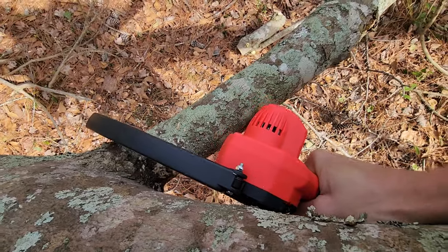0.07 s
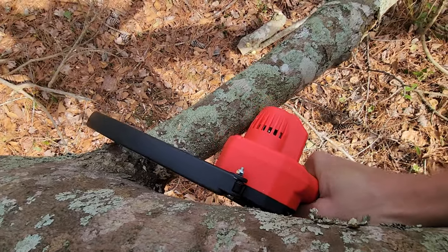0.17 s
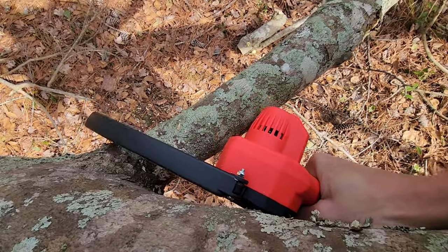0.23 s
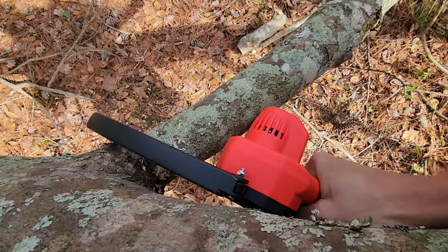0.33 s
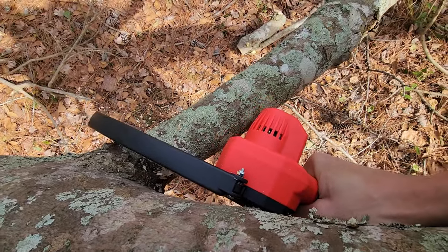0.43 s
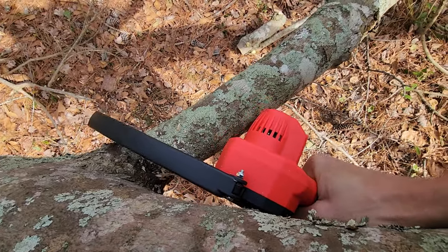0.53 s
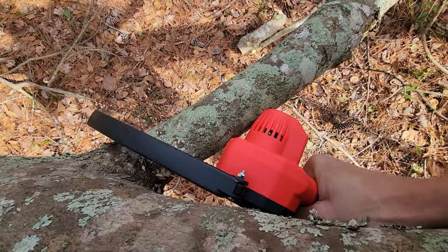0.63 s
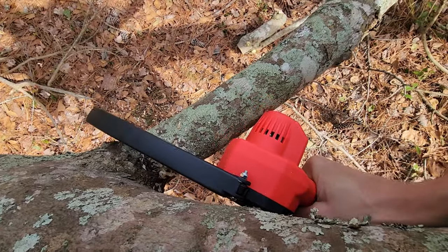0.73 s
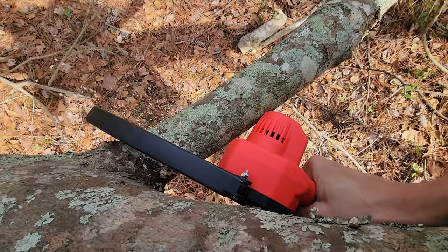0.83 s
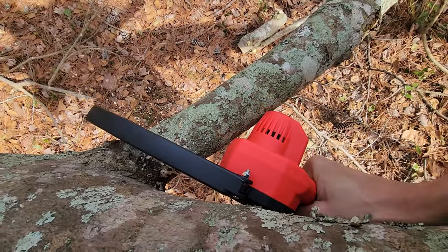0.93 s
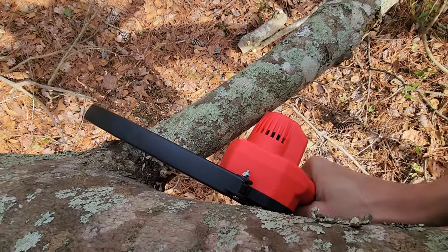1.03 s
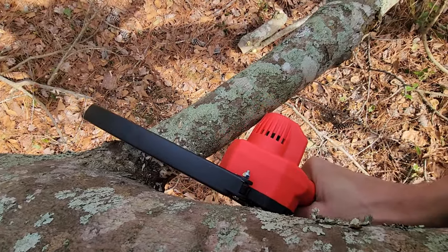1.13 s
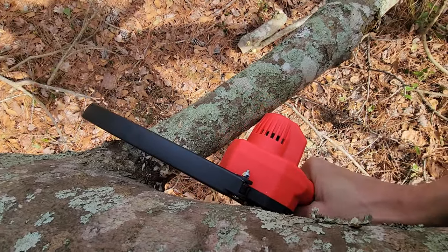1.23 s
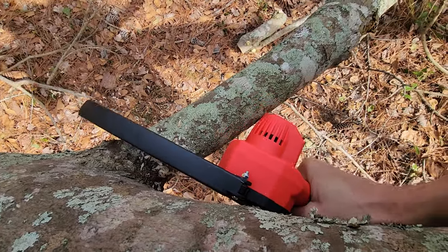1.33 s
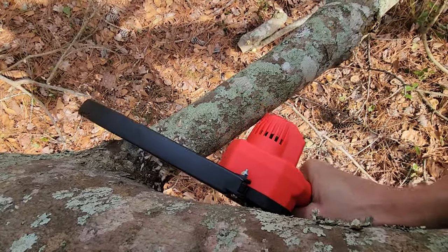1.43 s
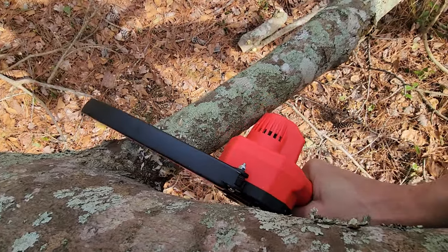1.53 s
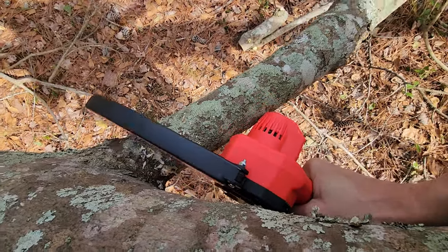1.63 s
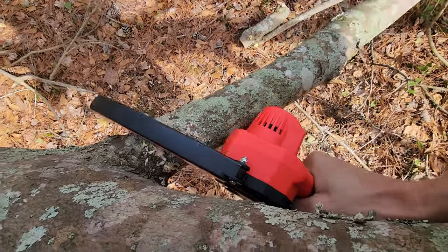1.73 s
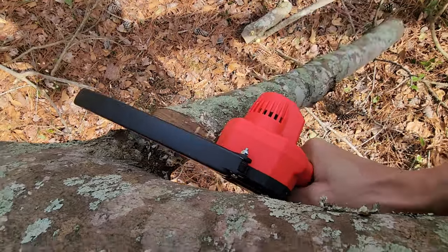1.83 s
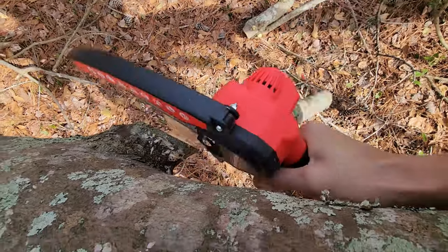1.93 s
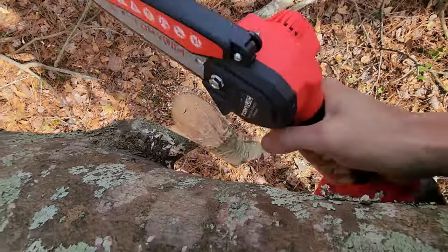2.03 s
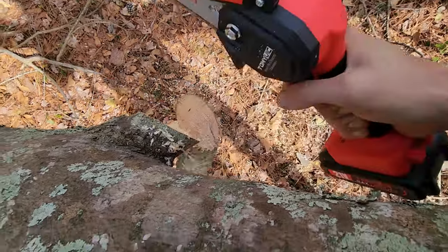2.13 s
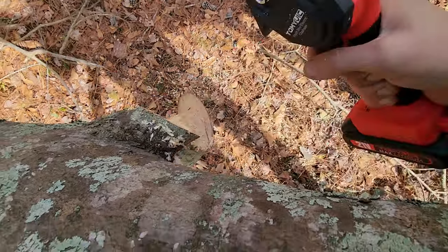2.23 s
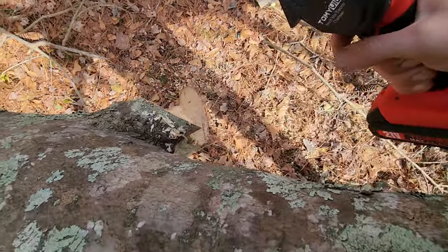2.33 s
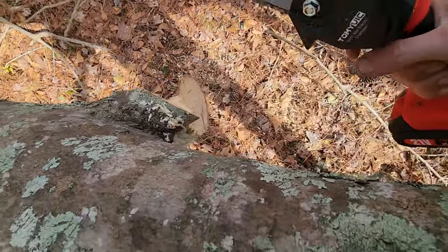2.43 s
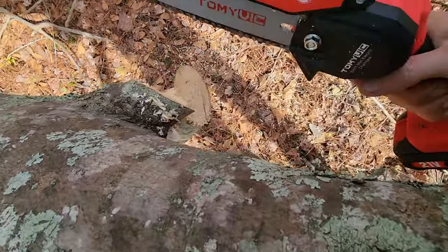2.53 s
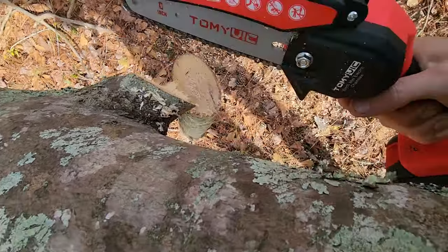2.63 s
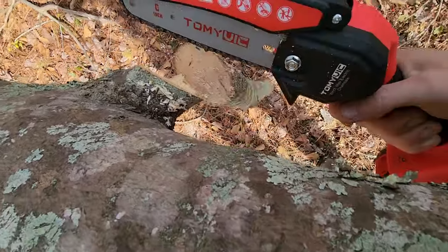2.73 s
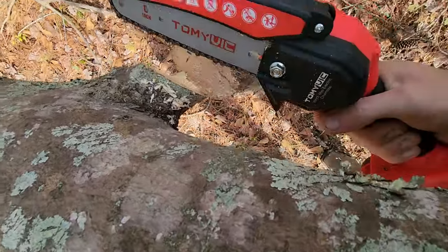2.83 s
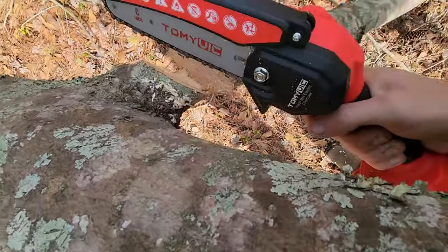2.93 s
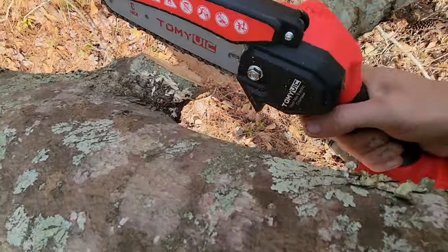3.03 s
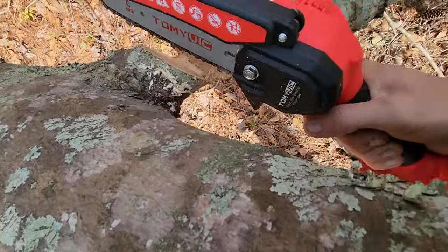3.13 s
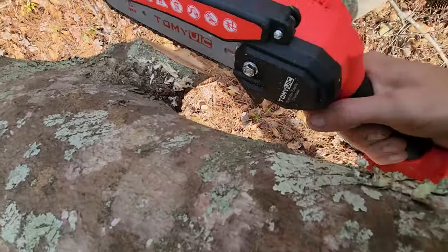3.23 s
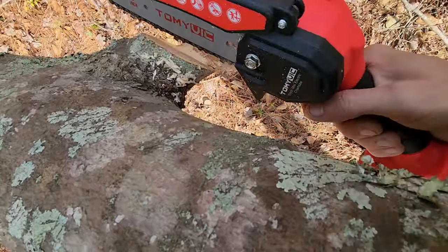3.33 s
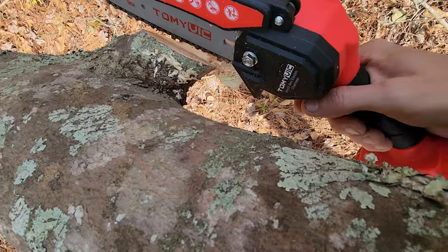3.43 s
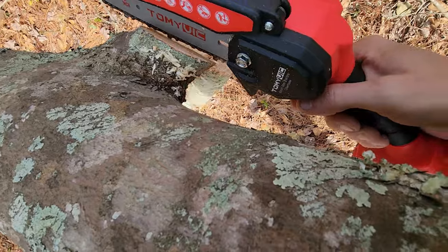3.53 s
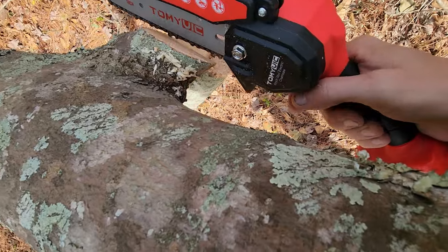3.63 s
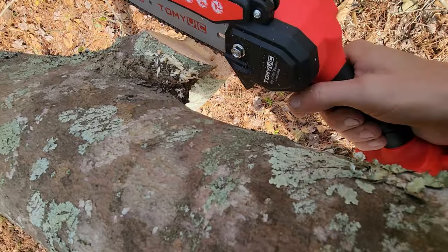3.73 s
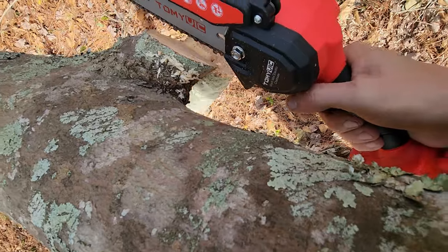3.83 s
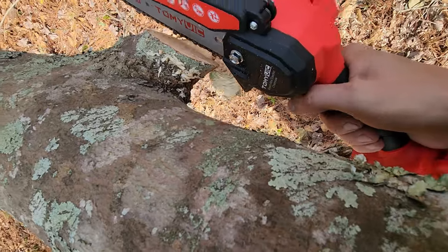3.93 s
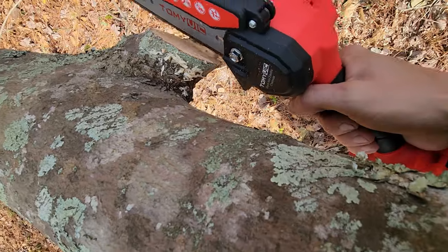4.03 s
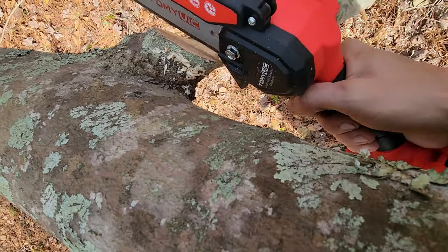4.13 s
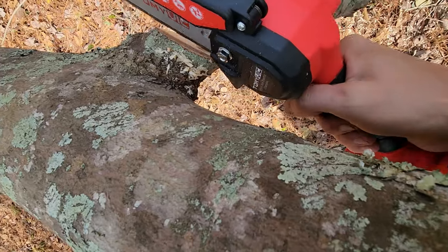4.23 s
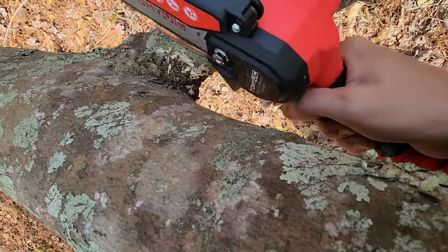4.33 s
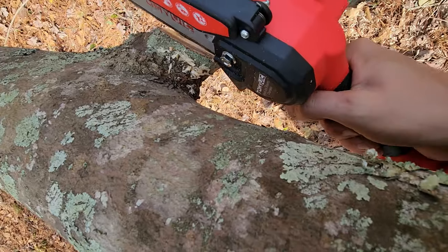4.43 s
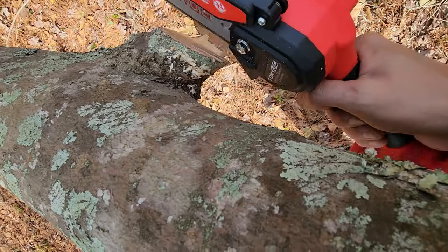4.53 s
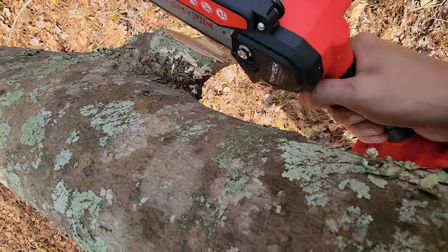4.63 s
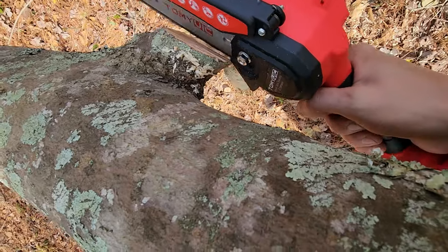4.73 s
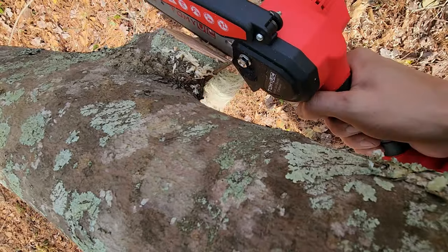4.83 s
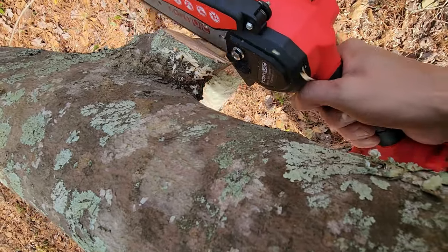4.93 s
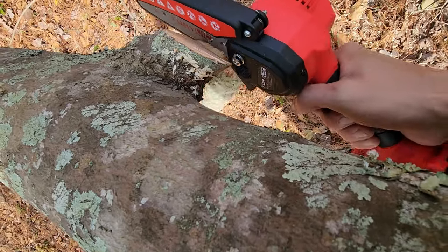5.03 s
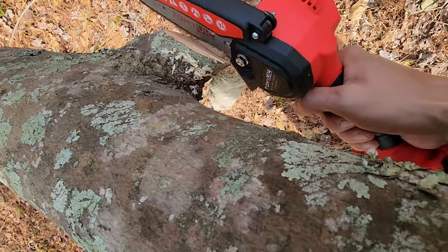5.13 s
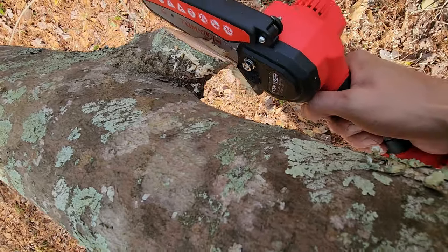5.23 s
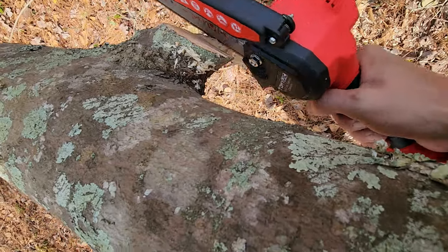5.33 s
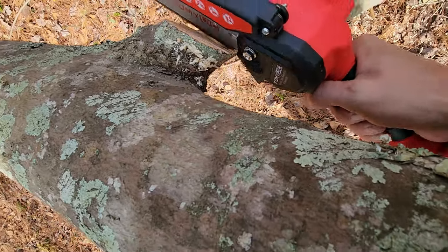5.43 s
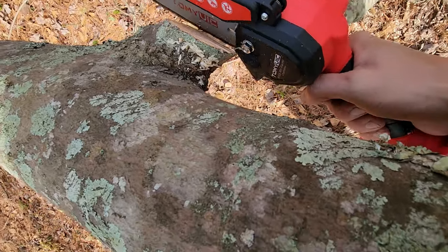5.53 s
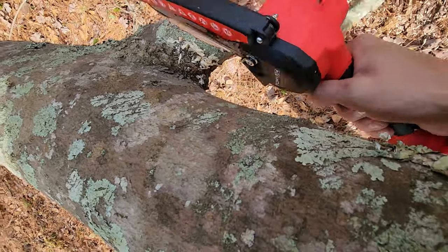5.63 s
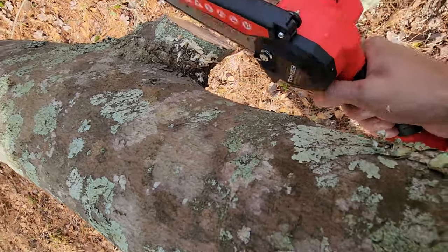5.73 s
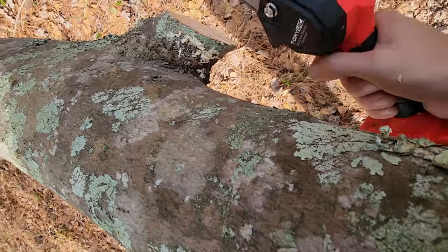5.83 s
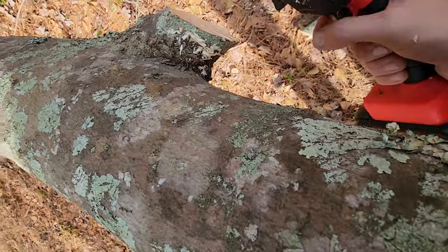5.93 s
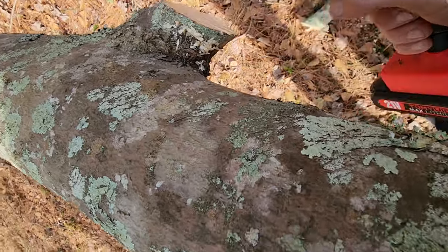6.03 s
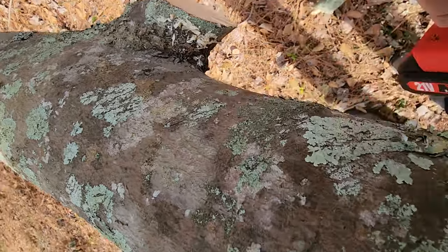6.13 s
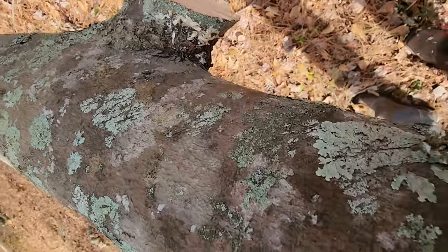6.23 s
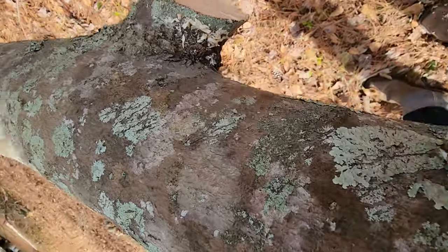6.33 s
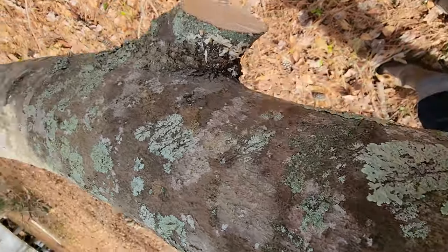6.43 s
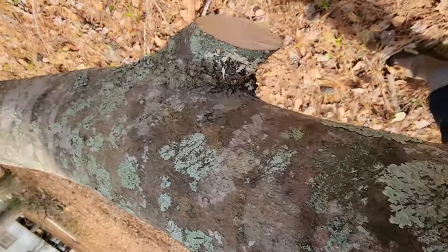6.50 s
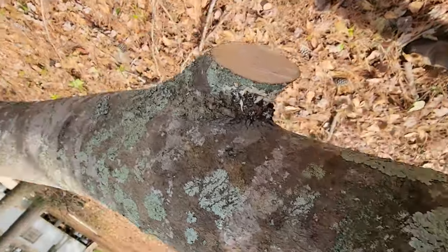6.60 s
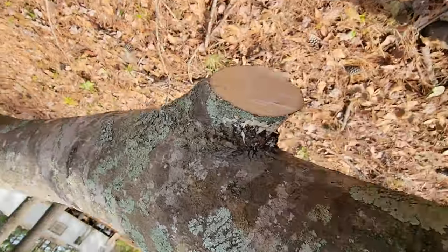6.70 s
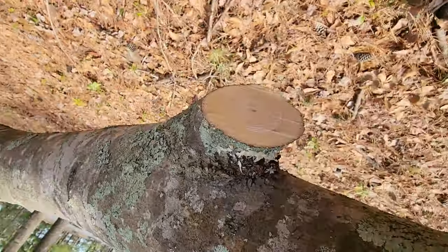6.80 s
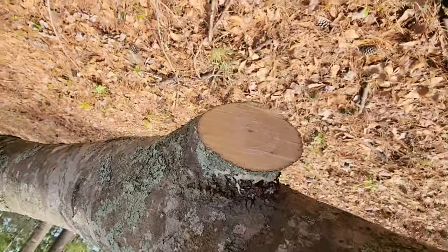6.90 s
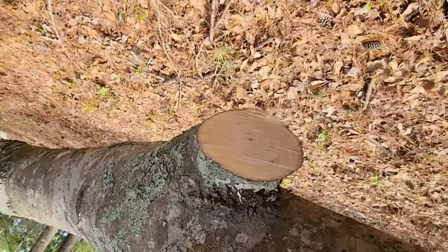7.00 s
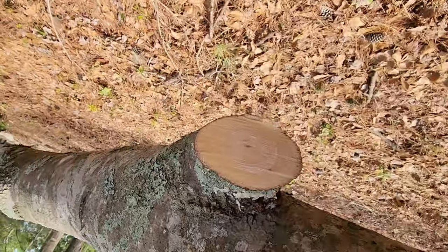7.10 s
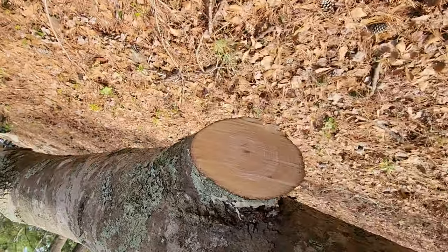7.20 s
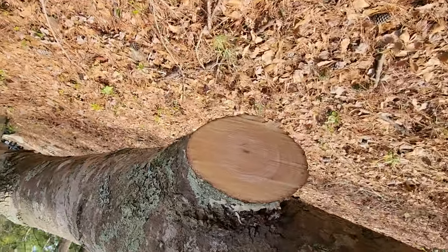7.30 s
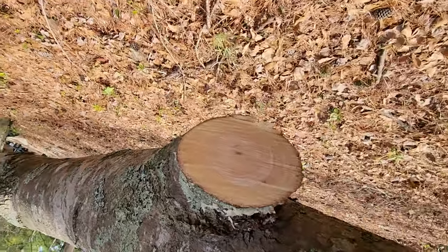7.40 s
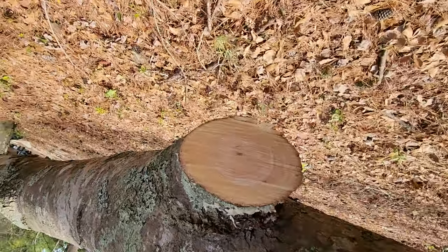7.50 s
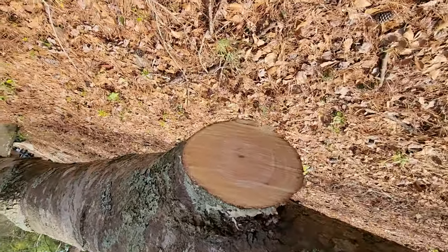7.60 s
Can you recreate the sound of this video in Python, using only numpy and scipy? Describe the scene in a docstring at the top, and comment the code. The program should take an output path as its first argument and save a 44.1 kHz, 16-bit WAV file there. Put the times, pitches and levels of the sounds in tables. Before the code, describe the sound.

A small battery chainsaw is already cutting a branch, at arm's length from a stereo microphone in quiet woods. The chain clatters on the steel bar, the gears whine unevenly, and the teeth knock and rasp in the wood, with thin high squeals. Around 1.6 seconds the motor sags and nearly stalls. At 1.9 it breaks free with a bright racing rattle, then coasts down in pitch, stopping at about 2.9. Light clicks and soft rubbing follow as the saw shifts in the hand. At 4.1 a sharp click starts it again, and it trims the stub, faster and steadier, with short bites and a dull bump near 5.9. From 6 seconds it winds down, stopping at about 6.7. Dry leaves and small twigs then crackle softly underfoot on the right until about 7.5, over a faint outdoor rumble and hiss.

```python
"""A small battery chainsaw, at arm's length from a stereo microphone in quiet woods, cuts a branch off a
fallen log, coasts to a stop, then trims the stub. Chain links clatter on the steel bar and ring the
plastic casing, the gears whine and sag under load, the teeth knock in the wood and the bar squeals in
the kerf. Between and after the cuts the saw clicks and rubs in the hand, close by; at the end dry
leaves crackle underfoot, off to the right."""
import sys
import numpy as np
from scipy import signal
from scipy.fft import rfft, irfft, next_fast_len
from scipy.io import wavfile

SR = 44100
rng = np.random.default_rng(int(sys.argv[2]) if len(sys.argv) > 2 else 0)


def to_wav(sig):
    """Store sig (one row per channel, or 1-D mono) as 16-bit WAV at the path in sys.argv[1].

    Samples outside -1..1 are clipped; the rate is SR.
    """
    pcm = np.clip(np.atleast_2d(sig), -1, 1) * 32767
    pcm = np.round(pcm).astype(np.int16)
    wavfile.write(sys.argv[1], SR, pcm.T)  # frames by channels


N = 337806
T = np.arange(N) / SR
FREQS = np.fft.rfftfreq(2 * next_fast_len(N // 2 + 4096), 1 / SR)
SIZE = 2 * (len(FREQS) - 1)
CREEP_HZ, WORKING_HZ = 20, 800  # links per second: the chain falls silent, the chain works

# Levels in the tables are relative: each source applies its own gain on top.
# The chain under power, one list per run, until the trigger is let go.
# Each row: time in seconds, speed in links per second.
DRIVEN_SPEED = [
    [(-.04, 469.3), (.1, 586.3), (.18, 608.3), (.3, 604.6), (.45, 660), (.52, 677.5), (.6, 634), (.72, 616),
     (.8, 653.4), (.87, 622.5), (.93, 663), (1.07, 679.7), (1.15, 642), (1.3, 603), (1.38, 698.6),
     (1.45, 673), (1.5, 579.2), (1.56, 496.3), (1.65, 400.8), (1.72, 449.6), (1.82, 471.2), (1.93, 935),
     (2.05, 967)],
    [(4.141, 230.5), (4.168, 509.7), (4.19, 668), (4.24, 844), (4.7, 853.3), (5.15, 809), (5.5, 868.6),
     (5.7, 827), (5.95, 898)],
]
# What stops the chain after each run. Each row: friction in Hz per second, drag time in seconds.
CHAIN_BRAKING = [(870, 1.8), (865, 1.34)]
# The saw at working speed, one list per run.
# Each row: time in seconds, then casing clatter, steel chatter and fine spray in dB.
SAW_LEVELS = [
    [(.15, -22, -21, -20.5), (.6, -23.5, -23, -23), (1.35, -23.5, -22.5, -25), (1.7, -23, -20.8, -25),
     (1.88, -24, -21.5, -23.5), (2.03, -25.5, -23.5, -23.5), (2.17, -24.5, -22.5, -22),
     (2.3, -27, -22.5, -25), (2.55, -28, -24.5, -25.5), (2.7, -29, -24.5, -27), (2.85, -28.5, -28, -35)],
    [(4.17, -20.5, -16.5, -18.5), (4.35, -23, -21.5, -21), (4.75, -22.5, -22, -23), (4.97, -23, -20.5, -20),
     (5.2, -24, -21.5, -25), (5.65, -24, -21, -21), (5.82, -25, -21.5, -28.5), (5.97, -26, -23.5, -23),
     (6.08, -25, -25, -24.5), (6.25, -25.5, -25, -24.5), (6.45, -29, -27, -26), (6.6, -31, -26.5, -30)],
]
# Gear rattle against the clatter in a slow, unloaded chain. Each entry: one run's level in dB.
GEAR_RATTLE_DB = [-6.3, -3.5]
# The loaded tones as the load shifts. Each row: time in seconds, then low, middle and high tone in dB.
LOADED_TONE_LEVELS = [(0, 0.5, 1, -2), (.18, -0.5, -3, 2.5), (.3, 1.5, -2.5, -1.5), (.38, 1, -2, 0.5),
                      (.52, -1.5, 3, -2.5), (.62, -0.5, -1.5, 1.5), (.76, -0.5, 0, -1),
                      (.9, -1.5, -1.5, -0.5), (1.05, 0, 2, -3), (1.2, -4.5, -1, 0), (1.35, -2, -2.5, -0.5),
                      (1.5, -3.5, -3, -4.5), (1.58, -5, 2.5, -8), (1.67, -5.5, -1, -7.5),
                      (1.8, -4, 2.5, -6.5), (1.9, -0.5, -1, 0)]

# Tones of the drive. Each row: multiple of the link rate, level in dB, width in Hz at cutting speed.
LOADED_TONES = [(1, -1, 24), (2.87, -1.5, 100), (4.65, -2, 75)]
SPIN_UP_TONES = [(1, -4, 20), (2.87, 0, 60)]
FREE_GEAR_TONES = [(2.92, 0, 68), (4.7, -2.5, 160), (6.7, -6, 240), (8.5, -3, 260)]

# Sounds that rise, hold and die away. Each row: start in seconds, length in seconds, level in dB.
WOOD_CONTACT = [(-.04, 2.0, -39), (4.16, 1.82, -48)]  # teeth resting in the branch, then the stub
DEEP_BITES = [(-.04, 0.21, -29.5), (.21, 0.2, -26), (.44, 0.42, -30.5), (.92, 0.057, -31),
              (1.05, .2, -33.5), (1.29, .02, -29.5), (1.39, 0.28, -35), (1.73, 0.13, -29),
              (4.16, 0.048, -35.5), (4.3, 0.03, -26.5), (4.405, 0.059, -30.5), (4.49, 0.017, -33.5),
              (4.56, 0.04, -33), (4.82, 0.033, -35), (4.93, 0.039, -34), (4.985, 0.032, -24),
              (5.125, 0.057, -25.5), (5.36, 0.028, -33), (5.612, 0.027, -27), (5.66, 0.087, -31)]  # teeth digging in harder
MOTOR_STRAIN = [(-.04, 1.84, -6), (.05, 0.84, -10), (1.12, .2, -10), (1.55, 0.31, -5)]  # labouring, pinched twice, then nearly stalling
BAR_SQUEALS = [(-.04, 1.65, -27), (.42, .11, -20), (.78, 0.34, -22.5), (1.32, 0.051, -16),
               (1.41, 0.029, -19), (1.68, 0.094, -25), (1.84, 0.047, -24), (6.44, 0.084, -32)]  # the bar rubbing the kerf, or singing as the chain slows
CUTTER_SNAGS = [(.74, 0.034, -14.5), (1.05, 0.028, -30), (1.82, 0.017, -19.5), (4.162, .018, -21),
                (4.408, 0.046, -25), (4.492, 0.02, -12.5), (4.99, 0.029, -33), (5.135, 0.06, -16),
                (5.612, 0.02, -15)]  # a cutter catching and rattling the casing
CHAIN_WHIPS = [(1.9, .17, -24.5), (2.0, .08, -27.5)]  # the chain coming free of the branch
HAND_SHIFTS = [(2.8, 0.11, -52.5), (3.0, .22, -65), (4.03, .1, -61.5), (6.62, 0.055, -58)]  # the saw moving in the hand
MOTOR_SPIN_UP = [(4.163, .035, -6.5)]  # starting at full torque
LEAF_RUSTLES = [(6.63, 0.7, -55), (6.76, .02, -52), (6.83, 0.18, -49.5), (7.15, 0.15, -50),
                (7.38, 0.28, -68)]  # dry leaves underfoot

# Parts that ring. Each row: frequency in Hz, width in Hz, level in dB.
CASING_MODES = [(695, 130, -5), (882, 110, 2), (987, 330, -2), (1437, 200, 4), (1593, 515, -1),
                (2183, 370, -0.5)]  # plastic casing, chain taut
SLACK_CASING_MODES = [(827, 120, -2), (1079.8, 180, -9.5), (1500, 350, 0), (1750, 171, 2.5),
                      (2030, 360, 0.5)]
BAR_MODES = [(3760, 150, -8), (4300, 260, 0), (4700, 470, -7.5), (5480, 270, -2.5), (6120, 300, -2),
             (7354, 290, 0)]  # steel bar, chain taut
SLACK_BAR_MODES = [(3480, 450, -8), (4840, 1100, -5.5), (6330, 530, 0.5), (7600, 200, 0.5),
                   (7720, 290, -6.5), (8200, 210, -5.5)]
GEAR_COVER_MODES = [(830, 120, -1.5), (1440, 300, 1.5), (2150, 400, -3.5)]
BRANCH_MODES = [(65, 30, -7), (117, 22, -2.5), (178.7, 12, 5), (257, 37, -1.5), (357, 77, -5),
                (560, 73, -2)]
STUB_MODES = [(68, 20, -2.5), (104.2, 26, 2), (160, 24, 0), (259, 36, -1.5), (369, 180, -9.5),
              (574, 70, -2.5)]
HANDLE_MODES = [(430, 47, 6.5), (794, 580, -7), (1250, 60, -4.5), (2010, 450, -18.5)]

# Tone colours at the microphone. Each row: frequency in Hz, level in dB.
STEEL_COLOUR = [(1500, -30), (2500, -2), (3000, -3), (3700, 0.5), (4400, -1.5), (5000, 1.5), (5500, 1),
                (5950, -3.5), (6400, -3.5), (6900, -3.5), (7400, -2.5), (8200, -4.5), (9500, -21.5),
                (13000, -38)]  # links scraping the bar
SPRAY_COLOUR = [(6000, -38), (8500, -7), (9800, -6), (11000, -2), (12300, 1), (14000, -1), (16000, -4.5)]  # fine ticks off the chain
HOUSING_COLOUR = [(150, -28), (460, -18.5), (610, -1.5), (800, -6.5), (1100, -4.5), (1380, -4.5),
                  (1700, -5), (1950, 2), (2300, -9.5), (2900, 0.5), (3500, -10), (6000, -12)]  # what the housing passes of the whine
FIBRE_COLOUR = [(120, -14), (300, -4), (600, -3), (1300, 0), (2300, -5.5), (4000, -14.5), (9000, -29)]  # wood tearing
TICK_COLOUR = [(200, -26), (800, -4.5), (1400, -4), (2600, -8), (4000, 0), (5500, 4.5), (7000, 2),
               (9500, -9.5), (12500, -0.5), (16000, -10.5)]  # chips and clicks
WOODS_COLOUR = [(25, -11), (60, -2), (120, -6.5), (200, -18), (450, -23), (1000, -31.5), (2800, -40.5),
                (5500, -34), (7300, -37), (9300, -58.5), (12500, -51), (16000, -56)]
LEAF_COLOUR = [(200, -26), (500, -5.5), (750, -12.5), (1200, -11.5), (2000, -9.5), (2700, -15.5),
               (3700, -5.5), (5400, -2), (7200, 1), (8300, -14), (9700, -27), (12000, 0), (16000, -10.5)]

# The saw bumping the log or knocking in the hand.
# Each row: start in seconds, level in dB, pitch in Hz, seconds to fall 60 dB.
BODY_BUMPS = [(0.251, -22.5, 76, 0.29), (3.162, -48.5, 75, .15), (3.641, -38, 97, 0.097),
              (4.305, -26.5, 105, 0.058), (4.825, -26.5, 88.3, 0.058), (5.011, -25, 101.2, 0.063),
              (5.619, -24, 88, 0.14), (5.705, -21, 96, 0.085), (5.85, -11.5, 101.1, 0.066)]
# Clicks of the slack chain, trigger and casing, and a few sharp cracks among the leaves at the end. Each row:
# time in seconds, level in dB, treble over bass in dB, seconds to fall 60 dB.
SAW_CLICKS = [(2.8, -34, -1, 0.45), (2.838, -24.5, -1, 0.014), (2.903, -31.5, 5.5, .007),
              (3.154, -46, -15.5, 0.073), (3.171, -36, -5.5, 0.01), (3.384, -49.5, -3.5, 0.046),
              (3.63, -26, 8, 0.015), (3.636, -33, -9.5, 0.036), (3.704, -47, -9, 0.01),
              (3.765, -34, -7, 0.036), (3.785, -21, 12, .011), (3.823, -24, 2.5, 0.015),
              (3.832, -27.5, 3.5, .041), (4.061, -49.5, -6.5, 0.22), (4.122, -38, 7.5, 0.027),
              (4.145, -9, -9, 0.063), (6.649, -29.5, 13, 0.025), (6.733, -33.5, -12.5, 0.018),
              (7.18, -24.5, 0, 0.01)]
# Leaves and twigs breaking. Each row: start in seconds, level in dB, pitch in Hz.
TWIG_SNAPS = [(6.69, -35, 4100), (6.712, -42, 4330), (6.757, -27.5, 4100), (6.863, -39, 5500),
              (6.88, -37, 6800), (6.965, -35, 7200), (7.007, -33, 7000), (7.144, -33, 6460),
              (7.217, -32, 6300), (7.276, -35, 6200), (7.389, -39, 6950), (7.424, -44, 4700),
              (7.47, -42.5, 7160)]

# Balance of the microphone's two ports. Each row: frequency in Hz, left minus right in dB.
MIC_TILT = [(60, -2), (200, -5), (400, -4), (700, -1.5), (1300, -5.5), (2400, -4.5), (4400, -6), (6500, -4),
            (8500, 1), (11000, 4.98), (15000, 3.71)]
# How alike the ports sound. Each row: frequency in Hz, likeness from 0 to 1.
MIC_LIKENESS = [(60, 1), (290, 0.59), (650, 0.93), (1300, 0.91), (2200, 0.37), (3200, 0.53), (4500, 0.21),
                (6300, 0.18), (9000, .08), (15000, .05)]
# How far the left port leads. Each row: frequency in Hz, phase in radians.
MIC_LEAD = [(200, 0), (1290, 0.69), (1810, 1.56), (2300, 0.38), (3200, 0), (4000, -3.5), (4900, -3),
            (6300, -0.76), (7300, -0.04)]


def undb(db):
    """Decibels to gain."""
    return 10 ** (np.asarray(db) / 20)


def unit(x):
    """Scale to rms 1."""
    return x / np.sqrt(np.mean(x ** 2))


def curve(rows, column=1):
    """One column of a table, joined by straight lines in time."""
    rows = np.array(rows)
    return np.interp(T, rows[:, 0], rows[:, column])


def strokes(rows, attack_s, release_s):
    """Gain of events that rise, hold and die away; overlapping ones sum in power."""
    power = 0
    for start_s, length_s, db in rows:
        rise = np.clip((T - start_s) / attack_s, 0, 1)
        fall = np.exp(-np.maximum(T - start_s - length_s, 0) / release_s)
        power = power + (undb(db) * rise * fall) ** 2
    return np.sqrt(power)


def across(points):
    """A table of (Hz, value) joined on a log-frequency axis."""
    hz, value = np.transpose(points)
    return np.interp(np.log(FREQS + 1), np.log(hz), value)


def colour(points):
    """Causal response with the given (Hz, dB) shape."""
    cepstrum = irfft(across(points) * np.log(10) / 20)
    return np.exp(rfft(2 * cepstrum[:SIZE // 2], SIZE) - cepstrum[0])


def band(low_hz, high_hz):
    """Steep band-pass magnitude."""
    f = FREQS + 1
    return 1 / np.sqrt((1 + (low_hz / f) ** 10) * (1 + (f / high_hz) ** 10))


def resonances(modes):
    """Response of a few damped modes, with steep skirts outside their range."""
    f = FREQS + 1
    body = sum((-1) ** k * undb(db) / (1 + 1j * (f * f - hz * hz) / (f * width))
               for k, (hz, width, db) in enumerate(modes))
    return body / (1 + 1j * f / (6.7 * modes[-1][0])) / (1 - 1j * 0.34 * modes[0][0] / f)


def at_mic(pair, response):
    """Filter two unrelated signals into left and right: alike in the bass, apart on top; mono rms 1."""
    likeness = np.clip(across(MIC_LIKENESS), -1, 1)
    mid, side = rfft(pair, SIZE) * response * np.sqrt([1 + likeness, 1 - likeness])
    lean = undb(across(MIC_TILT) / 2) * np.exp(.5j * across(MIC_LEAD))
    out = irfft([(mid + side) * lean, (mid - side) / lean])[:, :N]
    return out / np.sqrt(np.mean(out.mean(axis=0) ** 2))


def noise():
    """Two unrelated white noises."""
    return rng.standard_normal((2, N))


def walk(rate_hz):
    """Smooth random wander with spread near 1."""
    return 1.2 * np.interp(T * rate_hz, np.arange(N // 8), rng.standard_normal(N // 8))


def grains(per_s, spread_db):
    """Random tiny impacts, mostly weak, a few strong."""
    hit = rng.random(N) < per_s / SR
    return unit(noise() * hit * undb(spread_db * np.minimum(rng.exponential(size=N), 5)))


def chain_speed():
    """Links per second: driven while the trigger is held, then run down by friction and drag."""
    speed = CREEP_HZ
    for rows, (friction, drag_s) in zip(DRIVEN_SPEED, CHAIN_BRAKING):
        coasted_s = np.maximum(T - rows[-1][0], 0)
        run = (curve(rows) + friction * drag_s) * np.exp(-coasted_s / drag_s) - friction * drag_s
        speed = np.maximum(speed, run * (T >= rows[0][0]))
    return speed


def second_run():
    """True once the saw has started again on the stub."""
    return T >= DRIVEN_SPEED[1][0][0]


def slackness(full_hz=330, none_hz=760):
    """0 for a fast, taut chain, 1 for a slow one; the first cut keeps it taut."""
    return np.clip((none_hz - chain_speed()) / (none_hz - full_hz), 0, 1) * (T > 2)


def bite():
    """How hard the teeth work the wood: steady contact plus deeper bites."""
    return strokes(list(WOOD_CONTACT) + list(DEEP_BITES), attack_s=.0076, release_s=.025)


def in_wood():
    """1 while the teeth touch the wood, 0 when the chain runs free."""
    return np.clip(bite() / undb(WOOD_CONTACT[1][2]), 0, 1)


def loudness(column, power, fade_hz, fade_power=2):
    """Gain of one layer of the saw: a power of the chain speed, fading as the chain comes to rest."""
    speed = chain_speed()
    moving = np.clip((speed - CREEP_HZ) / (fade_hz - CREEP_HZ), 0, 1) ** fade_power
    return undb(curve(np.concatenate(SAW_LEVELS), column)) * (speed / WORKING_HZ) ** power * moving


def shaking(surge_db=12.5):
    """Gain of the casing: it follows the chain speed weakly and surges with each bite."""
    return loudness(column=1, power=.3, fade_hz=174, fade_power=.75) * (1 + undb(surge_db) * bite())


def strain(easy_db=-19.5):
    """Gain of the whine against the clatter, sinking to easy_db when the motor runs freely."""
    return np.hypot(strokes(MOTOR_STRAIN, attack_s=.012, release_s=.047), undb(easy_db))


def gear_play(slow_hz=600, fade_db_per_hz=.02, load_db=-14):
    """Gain of the gear rattle against the clatter: speed or load pulls the gear teeth together."""
    slow_db = np.where(second_run(), GEAR_RATTLE_DB[1], GEAR_RATTLE_DB[0])
    load = np.maximum(strain(), .5 * in_wood())
    return undb(slow_db - fade_db_per_hz * np.maximum(chain_speed() - slow_hz, 0) + load_db * load)


def link_blows(travel, lap_db, ring_s, play=1, scatter_db=.5, slack_hz=500):
    """Force of the links landing: uneven, with the same stiff links coming round on every lap."""
    link = travel.astype(int)
    size = undb(lap_db[link % len(lap_db)] - scatter_db * rng.standard_normal(N // 8)[link])
    late = play * rng.random(N // 8)[link]  # play lets a link land late in its turn
    landed = np.diff(link + (travel % 1 > late), prepend=0)
    speed = chain_speed()
    blows = signal.lfilter([1], [1, -np.exp(-1 / (ring_s * SR))], landed * size) / (ring_s * speed)
    loose = np.clip(.91 * (1 - speed / slack_hz), 0, 1)  # a slow chain jingles between blows
    return unit((1 - loose) * blows + loose * np.sqrt(size))


def slap(travel, links_per_beat=14.3, cutting_depth=.085, free_depth=.19):
    """Gain of the rattle as the chain swings against the bar and lifts off, deepest when it runs free."""
    depth = free_depth + (cutting_depth - free_depth) * in_wood()
    swing = np.abs(np.sin(np.pi * (travel / links_per_beat + .1 * walk(25))))
    beat = depth * (1 + .3 * walk(20)) * unit(swing - swing.mean())
    return unit(np.maximum(1 + beat, .15))


def chain(travel, links=41):
    """Links clatter through the casing, chatter on the steel bar and fling a fine spray of ticks."""
    lap_db = .96 * rng.standard_normal(links)
    blows = link_blows(travel, lap_db, ring_s=.0037) * undb(.86 * walk(35)) * slap(travel)
    taut, slack = np.sqrt(1 - slackness()), np.sqrt(slackness())

    shell = undb(-19.5) * colour([(60, -14), (250, -2.5), (500, 4), (3000, -11.5), (8000, -33.5)])
    slack_response = resonances(SLACK_CASING_MODES) * band(620, 1840) + undb(3.5) * shell
    knocks = blows * undb(1.3 * walk(90))
    casing = taut * at_mic(noise() * knocks, resonances(CASING_MODES) + shell)
    casing += slack * at_mic(noise() * knocks, slack_response)
    casing /= np.sqrt(1 + strain() ** 2 + .5 * gear_play() ** 2)  # whine and rattle take their share

    # a slack chain no longer damps the bar, so the scrape gives way to ringing
    scrape = at_mic((noise() + .35 * grains(5000, 1.2)) * blows, colour(STEEL_COLOUR))
    bar = undb(-3.07) * taut * at_mic(noise() * blows, resonances(BAR_MODES) * band(3300, 8000))
    bar += undb(.5) * slack * at_mic(noise() * blows, resonances(SLACK_BAR_MODES) * band(3000, 8800))
    chatter = (scrape * undb(-2.2 * slack) + bar) * loudness(column=2, power=.83, fade_hz=189)

    spray = at_mic((noise() + .3 * grains(5000, 2.5)) * blows, colour(SPRAY_COLOUR))
    spray *= undb(1.05) * loudness(column=3, power=1.02, fade_hz=184)
    return undb(.34) * casing * shaking() + chatter + spray


def whine(travel, tones, flutter_db, cutting_hz=640):
    """Gear tones that ride on the chain speed, smeared by backlash."""
    out = 0
    for multiple, db, width_hz in tones:
        slip = noise() * np.sqrt(2 * np.pi * width_hz / SR) * chain_speed() / cutting_hz
        phase = 2 * np.pi * multiple * travel + np.cumsum(slip, axis=1)
        out = out + undb(db + flutter_db * walk(60)) * np.sin(phase)
    return out


def drive(travel):
    """The drive sings under load and at spin-up; coasting, its tones glide down past the cover modes."""
    tones = [(multiple, db + curve(LOADED_TONE_LEVELS, column=k + 1), width_hz)
             for k, (multiple, db, width_hz) in enumerate(LOADED_TONES)]
    judder = unit(undb(2.5 * walk(180)))
    loaded = at_mic(whine(travel, tones, flutter_db=1) * judder, colour(HOUSING_COLOUR)) * strain()
    starting = at_mic(whine(travel, SPIN_UP_TONES, flutter_db=1.5), band(450, 2600))
    starting *= strokes(MOTOR_SPIN_UP, attack_s=.015, release_s=.04)
    rattle = undb(1.5 * walk(250)) * whine(travel, FREE_GEAR_TONES, flutter_db=1.5)
    free = at_mic(rattle, resonances(GEAR_COVER_MODES) * band(620, 2400)) * gear_play() * undb(-1)
    return (loaded + starting + free) * shaking()


def teeth(travel, links_per_cutter=5):
    """Each cutter knocks a chip out and rings the wood; fibres tear with a rasp, a snag rattles hard."""
    cuts = link_blows(travel / links_per_cutter, lap_db=np.zeros(1), ring_s=.0025, play=.5)
    branch = at_mic(noise() * cuts, resonances(BRANCH_MODES)) * undb(7.5) * bite()
    stub = at_mic(noise() * cuts, resonances(STUB_MODES)) * undb(5) * bite()
    rasp = at_mic(noise() * cuts, colour(FIBRE_COLOUR))
    rasp *= strokes(DEEP_BITES, attack_s=.006, release_s=.013)
    snag = at_mic(noise() * cuts, resonances(CASING_MODES))
    snag *= strokes(CUTTER_SNAGS, attack_s=.004, release_s=.008)
    return snag + np.where(second_run(), stub + undb(-1) * rasp, branch + undb(-3) * rasp)


def chips():
    """Flung chips tick against the guard while the teeth are in the wood."""
    return at_mic(grains(per_s=140, spread_db=2), colour(TICK_COLOUR)) * undb(-35) * in_wood()


def squeal(hz=6400, width_hz=330):
    """The pinched bar rings in short stick-slip bursts."""
    bursts = noise() * undb(3.1 * walk(220))
    ring = resonances([(hz, width_hz, 0)]) * resonances([(hz, 4 * width_hz, 0)])
    return at_mic(bursts, ring) * strokes(BAR_SQUEALS, attack_s=.022, release_s=.042)


def woods():
    """The woods all round the microphone: low rumble and faint hiss, gently wavering."""
    return at_mic(noise() * undb(1.9 * walk(16)), colour(WOODS_COLOUR)) * undb(-57.5)


def bumps():
    """The saw body kicks against the log or the hand: a dull, quickly damped thud."""
    out = 0
    for start_s, db, hz, decay_s in BODY_BUMPS:
        age = np.maximum(T - start_s, 0)
        out = out + undb(db - 60 * np.minimum(age / decay_s, 3)) * np.sin(2 * np.pi * hz * age)
    return out * undb([[-1.2], [1.2]])  # just right of centre


def whip(hz=4900, width_hz=800):
    """Out of the kerf the racing chain rattles brightly on the bar for a moment."""
    ring = resonances([(hz, width_hz, 0)]) * band(4200, 6000)
    rattle = noise() * undb(1.7 * walk(150))
    return at_mic(rattle, ring) * strokes(CHAIN_WHIPS, attack_s=.025, release_s=.035)


def clicks(split_hz=2500, rise_share=.034):
    """Slack chain, trigger and casing click close by, and a few twigs crack among the leaves at the end; the
    longer clicks are scrapes with a soft start."""
    bass, treble = np.zeros(N), np.zeros(N)
    for time_s, db, bright_db, decay_s in SAW_CLICKS:
        age = (T - time_s) / decay_s
        envelope = np.clip(1 + age / rise_share, 0, 1) ** 2 * undb(db - 60 * np.clip(age, 0, 3))
        bass += envelope * undb(-bright_db / 2)
        treble += envelope * undb(bright_db / 2)
    lowpass = 1 / (1 + 1j * FREQS / split_hz) ** 2
    out = 0
    for force, response in [(bass, lowpass), (treble, 1 - lowpass)]:
        force_rms = np.sqrt(np.mean(force ** 2))
        out = out + at_mic(noise() * force, colour(TICK_COLOUR) * response) * force_rms
    return undb(-13.5) * out


def handling():
    """Soft rubbing rings the hollow handle as the saw shifts in the hand."""
    rubbing = at_mic(noise() * undb(3 * walk(45)), resonances(HANDLE_MODES))
    return rubbing * strokes(HAND_SHIFTS, attack_s=.022, release_s=.061)


def leaves():
    """Dry leaves crackle densely underfoot, to the right of the microphone."""
    crackle = (.7 * noise() + grains(2200, 2.6)) * undb(2 * walk(110))
    rustle = at_mic(crackle, colour(LEAF_COLOUR)) * strokes(LEAF_RUSTLES, attack_s=.02, release_s=.042)
    return rustle * undb([[-7.5], [1.3]])


def snaps(width_hz=1100, crack_db=-13, decay_s=.016):
    """Each snap is a tiny crack that rings one stiff leaf or twig, off to the right."""
    out = np.zeros((2, N))
    age = T[:SR // 20]
    for start_s, db, hz in TWIG_SNAPS:
        crack = rng.standard_normal((2, len(age))) * undb(db - 60 * age / decay_s)
        ring = signal.lfilter(*signal.iirpeak(hz, hz / width_hz, fs=SR), crack)
        start = int(start_s * SR)
        out[:, start:start + len(age)] += ring + undb(crack_db) * crack
    return out * undb([[-1], [5]])


def scene():
    """The saw close to the microphone, the forest floor below and the woods behind."""
    free_waver, cut_waver, tooth_waver = .01 * walk(38), .008 * walk(38), .014 * walk(160)
    waver = free_waver + in_wood() * (cut_waver + tooth_waver)  # share of the chain speed
    travel = np.cumsum(chain_speed() * (1 + waver)) / SR  # links gone by
    saw = chain(travel) + drive(travel) + teeth(travel) + chips() + squeal() + whip()
    return saw + bumps() + clicks() + handling() + leaves() + snaps() + woods()


def record(dry):
    """Limit the rare highest peaks and cut the top above 15.8 kHz."""
    lowpass = signal.ellip(12, .1, 75, 15800, fs=SR, output="sos")
    return signal.sosfilt(lowpass, np.clip(dry, -.88, .88))


dry = scene()
out = record(dry)
to_wav(out)
```